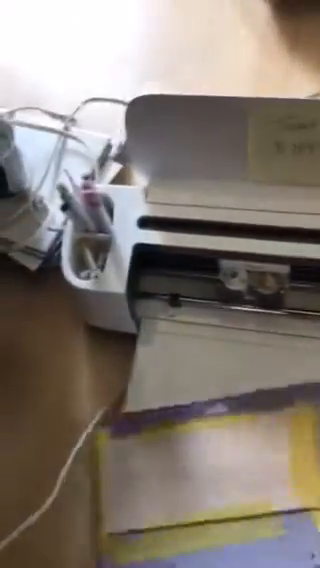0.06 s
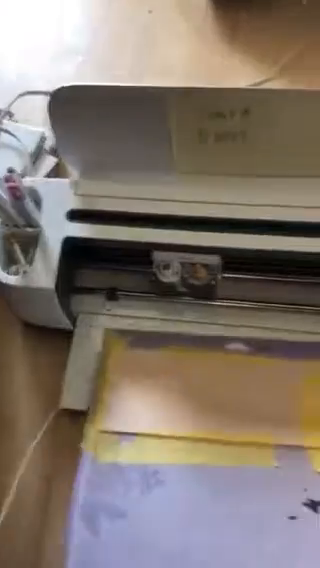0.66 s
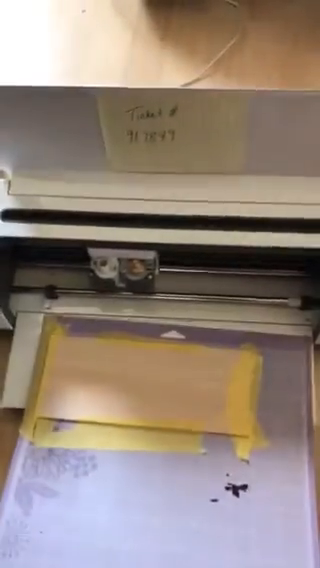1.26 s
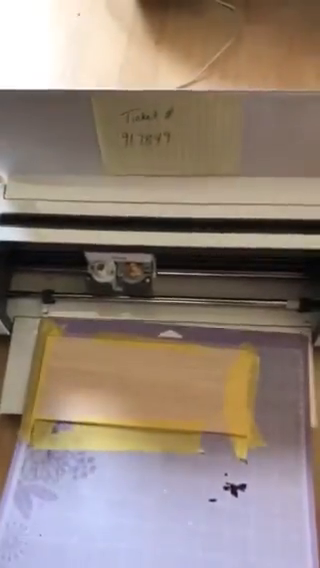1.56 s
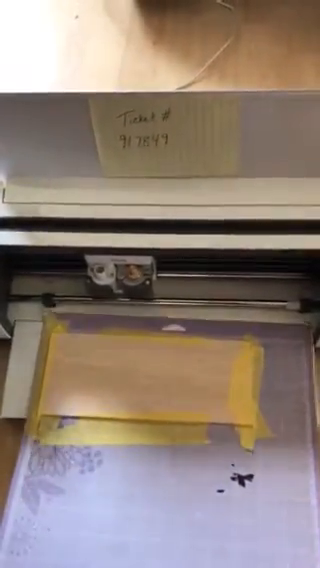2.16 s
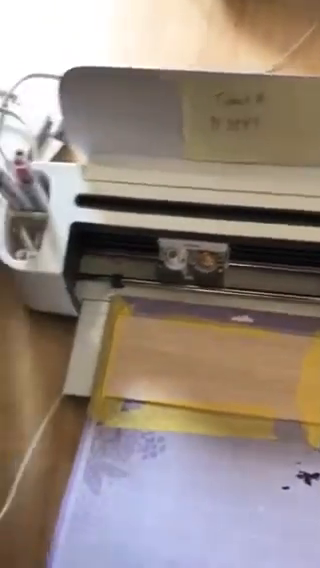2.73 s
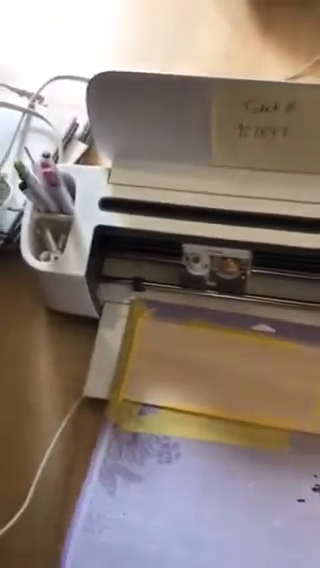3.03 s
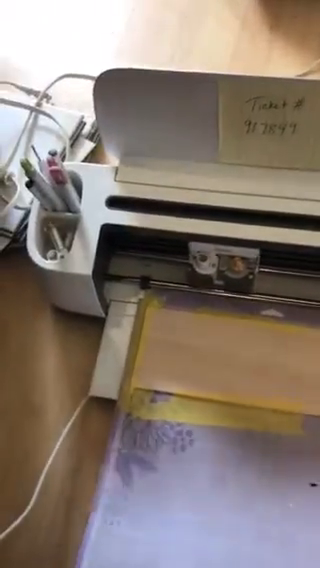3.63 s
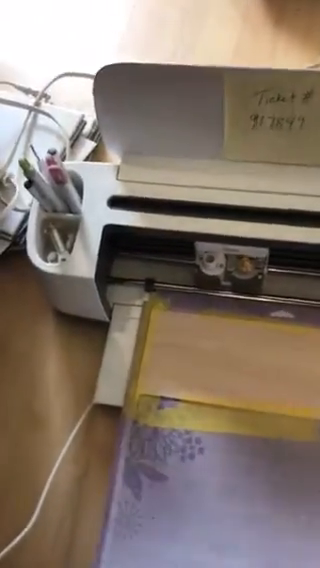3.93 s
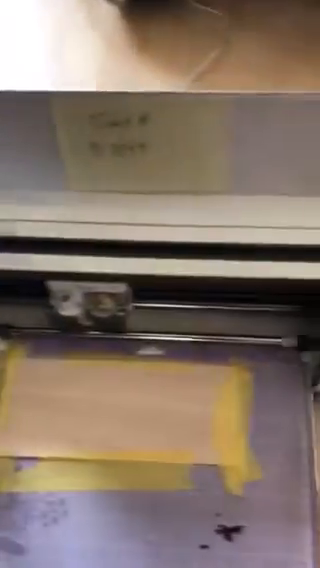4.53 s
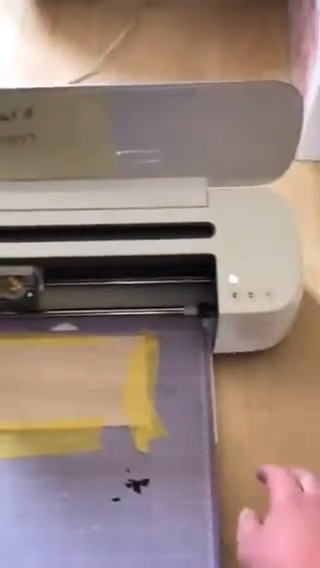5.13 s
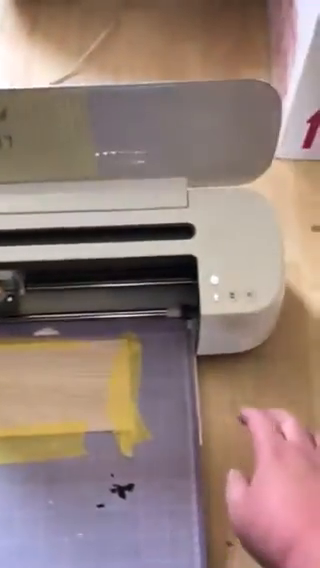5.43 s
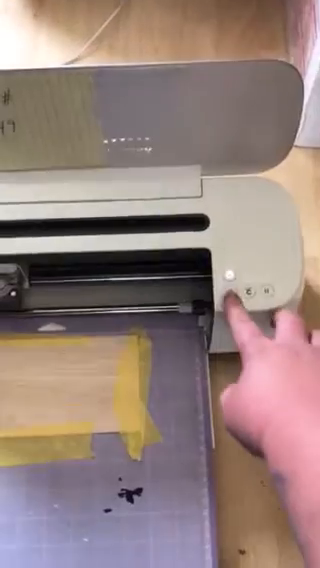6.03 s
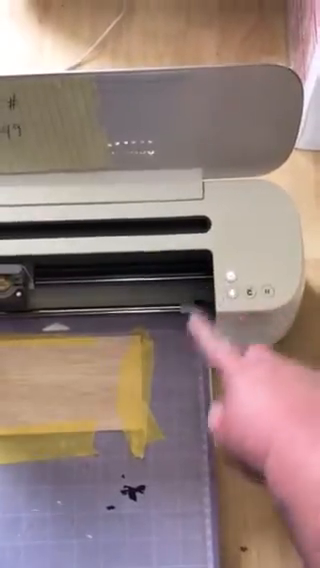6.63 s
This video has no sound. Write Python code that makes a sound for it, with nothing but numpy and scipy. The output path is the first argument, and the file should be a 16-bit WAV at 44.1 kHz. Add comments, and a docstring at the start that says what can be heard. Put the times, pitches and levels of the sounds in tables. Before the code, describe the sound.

Plastic mat swishing into a craft cutter, with light rubs and taps, followed by button clicks and a short motor whir.

```python
"""In a small, quiet room, a plastic mat is slid into a craft cutting machine on a desk.
Stick-slip friction makes the mat swish over the tray, and the sheet wobbles as it bends.
It knocks on the rollers, flicks over ridges and is nudged into line; each impact rings damped modes.
A finger clicks the load button and the feed motor whirs up, its gear teeth singing at multiples
of the shaft rate and rattling once a turn. A low rumble and hum lie underneath."""
import sys
import numpy as np
from scipy import signal
from scipy.fft import rfft, irfft
from scipy.io import wavfile
from scipy.ndimage import uniform_filter1d

SR = 44100
rng = np.random.default_rng(int(sys.argv[2]) if len(sys.argv) > 2 else 0)


def pcm_store(signal):
    """Save signal as 16-bit PCM."""
    levels = np.round(np.clip(np.atleast_2d(signal), -1, 1) * 32767)
    wavfile.write(sys.argv[1], SR, levels.astype(np.int16).T)


N = 303408
TIME = np.arange(N) / SR

# normal modes of mat and tray: frequency_hz, level_db, nominal_t60_s
MAT_AND_TRAY_MODES = [(199, -15.5, 0.24), (287.5, -7.5, 0.14), (336, -9.5, 0.12), (423, 1.5, 0.052),
                      (512.4, 0.5, 0.063), (560, -6.5, 0.079), (773, -1.5, 0.07), (887, 0, 0.057),
                      (1085, -17, 0.033), (1253, -5, 0.076), (1570, -17, 0.061), (1957, -7, 0.033),
                      (2466, -3.5, 0.053), (3330, 2.5, 0.02)]


def amp(db):
    """Amplitude ratio of a level in decibels."""
    return 10 ** (np.asarray(db) / 20)


def unit(x):
    """Normalisation to rms 1."""
    return x / np.sqrt(np.mean(x ** 2) + 1e-20)


def read(points, hz):
    """Interpolation of a table on a log-frequency axis."""
    f, value = np.transpose(points)
    return np.interp(np.log(hz + 1), np.log(f + 1), value)


def colour(x, spectrum):
    """Spectral shaping: x is weighted by a curve in dB, then set to rms 1."""
    return unit(irfft(rfft(x) * amp(read(spectrum, np.fft.rfftfreq(len(x), 1 / SR))), len(x)))


def drift(hz):
    """Random modulation: noise low-passed near hz, at rms 1."""
    lowpass = np.exp(-(np.fft.rfftfreq(N, 1 / SR) / hz) ** 2)
    return unit(irfft(rfft(rng.standard_normal(N)) * lowpass, N))


def band(x, edge_hz, kind):
    """Causal low-, high- or band-pass filtering."""
    return signal.sosfilt(signal.butter(3, edge_hz, kind, fs=SR, output="sos"), x)


def resonate(x, hz, width_hz):
    """Resonance: two unity-gain resonators in cascade, each width_hz wide."""
    b, a = signal.iirpeak(min(hz, SR / 3), hz / width_hz, fs=SR)
    return signal.lfilter(b, a, signal.lfilter(b, a, x))


def add(mix, start_s, sound):
    """Superposition of a sound on the mix."""
    part = mix[max(round(start_s * SR), 0):][:len(sound)]
    part += sound[:len(part)]


def air(noise_db=-54):
    """Ambient noise: broadband rumble and hiss, with a hum modulated in amplitude and phase."""
    # spectrum of the room's air: frequency_hz, density_db
    spectrum = [(20, -46), (42, -8.5), (58, -1.5), (95, -3), (130, -5.5), (180, -13.5), (340, -15.5),
                (450, -24.5), (700, -25), (1250, -27.5), (2000, -31), (4500, -37.5), (10300, -51.5),
                (12500, -45.5), (16000, -50)]
    # partials of the hum: frequency_hz, waver_hz, level_db
    partials = [(102.6, 8.8, -63.5), (290, 18.4, -71)]
    hum = 0
    for hz, waver_hz, db in partials:
        swell = 1 + .5 * drift(waver_hz)
        hum += amp(db) * unit(swell * np.cos(2 * np.pi * hz * TIME + 0.82 * drift(waver_hz)))
    return amp(noise_db) * colour(rng.standard_normal(N), spectrum) + hum


def room(x, wet_db):
    """Reverberation: dense reflections follow the direct sound and decay fastest in the treble."""
    # reverberation time: frequency_hz, t60_s
    decay = [(200, 0.19), (1000, 0.25), (4000, 0.22), (14000, 0.13)]
    hz, t, noise = signal.stft(rng.standard_normal(SR // 2), SR, nperseg=256)
    tail = signal.istft(noise * amp(-60 * t / read(decay, hz)[:, None]), SR, nperseg=256)[1]
    tail *= np.clip(np.arange(len(tail)) / SR / 0.0042 - .5, 0, 1)  # reflections arrive from 2 ms on
    return x + amp(wet_db) * signal.fftconvolve(x, tail / np.linalg.norm(tail))[:N]


def strokes(rows, rise_s, fall_s):
    """Incoherent summation: hand movements rise, hold and die away, and their powers add."""
    power = np.zeros(N)
    for start_s, length_s, db in rows:
        t = np.arange(0, length_s + 10 * fall_s, 1 / SR)
        gain = amp(db) * np.minimum(t / rise_s, 1) * np.exp(-np.maximum(t - length_s, 0) / fall_s)
        add(power, start_s, gain ** 2)
    return np.sqrt(power)


def friction(slips_per_s, spread_db, hiss, judder_db):
    """Stick-slip friction: tiny uneven slips over a smooth hiss, bunched by the judder of the hand."""
    slips = rng.standard_normal(N) * (rng.random(N) < slips_per_s / SR)
    slips *= amp(spread_db * np.minimum(rng.exponential(1, N), 4))
    return (unit(slips) + hiss * rng.standard_normal(N)) * amp(judder_db * drift(41))


def shimmer(x, depth_db):
    """Spectral modulation: narrow bands swell and fade as the contact moves over the sheet."""
    spectra = signal.stft(x, SR, nperseg=512, noverlap=384)[2]
    patches = uniform_filter1d(rng.standard_normal(spectra.shape), size=3, axis=0)
    patches = unit(uniform_filter1d(patches, size=12, axis=1))
    return unit(signal.istft(spectra * amp(depth_db * patches), SR, nperseg=512, noverlap=384)[1][:N])


def mat_slide(body_db=-4.0, hiss_reference_db=-41.5, hiss_growth=0.47):
    """Sliding friction: the harder the mat is shoved over the tray, the greater the share of hiss."""
    # spectrum of the scrape: frequency_hz, density_db
    spectrum = [(350, -10), (600, 0), (834, -7.5), (881, -0.5), (1530, -3.5), (1880, 0), (2720, -3),
                (4220, -3.5), (8620, -14), (9620, -11), (10300, -14.5), (14500, -14.5), (16000, -24)]
    # shoves of the hand: start_s, length_s, level_db
    shoves = [(0.012, .12, -55.5), (.139, .115, -45), (.316, 0.045, -38.5), (.37, .025, -44.5),
              (.415, 0.028, -47), (.55, 0.073, -51.5), (.632, 0.12, -50.5), (3.378, 0.034, -60),
              (4.005, 0.029, -57)]
    push = strokes(shoves, rise_s=0.019, fall_s=0.025)
    slips = friction(slips_per_s=2700, spread_db=2.3, hiss=2.2, judder_db=0.63)
    scrape = shimmer(colour(slips, spectrum), depth_db=3)
    body = amp(body_db) * unit(band(scrape, 3500, "low"))
    hiss = unit(band(scrape, 3630, "high")) * (push / amp(hiss_reference_db)) ** hiss_growth
    return (body + hiss) * push


def mat_catch():
    """Forced resonance: slips drive the sheet into a rasp as the slowing mat catches on the tray."""
    # resonances of the sheet: frequency_hz, half_width_hz, gain_db
    resonances = [(980, 130, -1), (1166, 140, 4.5), (2090, 72, 2), (2380, 210, 1)]
    # catches on the tray: start_s, length_s, level_db
    catches = [(.376, 0.029, -43), (.418, 0.017, -36)]
    slips = friction(slips_per_s=740, spread_db=2.4, hiss=0.8, judder_db=0.78)
    rasp = unit(sum(amp(db) * resonate(slips, hz, 2 * half_hz) for hz, half_hz, db in resonances))
    return rasp * strokes(catches, rise_s=0.013, fall_s=0.0098)


def mat_rub(gain_db=-1.5):
    """Light friction: uneven slips make a dull rubbing as the mat is nudged into line."""
    # spectrum of the rubbing: frequency_hz, density_db
    spectrum = [(180, -4), (330, 3.5), (500, -1.5), (640, -8.5), (1030, -3.5), (1320, -2.5), (1950, -16.5),
                (2480, -8.5), (3130, -16), (5200, -21), (7500, -29), (10300, -31.5), (12500, -29.5),
                (16000, -33)]
    # nudges of the hand: start_s, length_s, relative_level_db
    nudges = [(.77, 0.059, -54.5), (.895, 0.14, -55), (1.04, 0.16, -61.5), (1.255, 0.03, -54),
              (1.57, 0.47, -60), (1.69, 0.034, -59), (2.14, 0.16, -52.5), (2.49, 0.041, -55),
              (2.755, 0.057, -54.5), (3.07, 0.12, -60.5), (3.25, 0.076, -55.5), (3.375, 0.18, -54),
              (3.57, 0.36, -64.5), (4.085, 0.08, -56.5), (4.195, 0.11, -58)]
    slips = friction(slips_per_s=900, spread_db=5.3, hiss=2.16, judder_db=2.6)
    rub = amp(gain_db) * shimmer(colour(slips, spectrum), depth_db=4)
    return rub * strokes(nudges, rise_s=0.011, fall_s=0.038)


def mat_flex():
    """Flexural vibration: the bending sheet radiates a low band of noise."""
    # spectrum of the wobble: frequency_hz, density_db
    spectrum = [(120, -29), (230, 2), (330, 6), (520, -4), (700, -16), (1200, -23), (3000, -50)]
    # bends as the mat is carried and pushed home: start_s, length_s, level_db
    bends = [(0, 0.44, -52.5), (.483, 0.1, -48), (.514, 0.028, -37.5), (.66, 0.083, -47.5)]
    return colour(rng.standard_normal(N), spectrum) * strokes(bends, rise_s=0.0084, fall_s=0.02)


def impacts(rows, modes, crack_spectrum, contact_s, mode_t60_scale, crack_db, crack_t60_s,
            spot_t60_s, spot_q):
    """Impact excitation: damped modes, a crack and the struck spot swell over the contact time."""
    out, t = np.zeros(N), np.arange(SR // 4) / SR
    swell = 1 - np.exp(-(t / contact_s) ** 2)
    for start_s, db, thud_db, snap_db, spot_hz, spot_db in rows:
        tones = sum(amp(mode_db - 60 * t / (t60 * mode_t60_scale))
                    * np.sin(2 * np.pi * (hz * t + rng.random())) for hz, mode_db, t60 in modes)
        grit = rng.standard_normal(len(t))
        crack = colour(grit, crack_spectrum) * amp(-60 * t / crack_t60_s)
        hit = (unit(tones) + amp(crack_db) * unit(crack)) * swell
        spot = resonate(grit * amp(-60 * t / spot_t60_s) * swell, spot_hz, spot_hz / spot_q)
        parts = band(hit, [215, 620], "band"), band(hit, [600, 2500], "band"), band(hit, 2500, "high")
        thud, middle, snap, spot = (p / np.std(p[:SR // 100]) for p in (*parts, spot))
        # relative to the middle band, a firm blow gives more thud and a hard one more snap
        blow = amp(thud_db) * thud - middle + amp(snap_db) * snap + amp(spot_db) * spot
        add(out, start_s, amp(db) * blow)
    return out


def mat_knocks():
    """Damped modal ringing: the mat, held by the hand, knocks on rollers and guides."""
    # knocks: start_s, level_db, thud_db, snap_db, spot_hz, spot_db
    knocks = [(.601,-30.5,8,1,753,6.5), (.755,-55,4,-18,508,10), (.937,-57.5,10.5,7.5,400,-6),
              (1.006,-62,-7,2.5,2120,7.5), (2.288,-43,3.5,-16,454,-4.5), (2.642,-56.5,-7,-14,2490,0.5),
              (2.786,-38.5,-2,-17,980,-2), (2.794,-50,-11,-20,316,4), (3.285,-52,-14,-11.5,1590,5),
              (3.751,-65,-2,-5,483,-7), (3.941,-61,6,-5.5,1150,8), (4.085,-40.5,-13,-13,915,-3),
              (4.113,-51,-3,-6.5,693,8), (4.21,-61,-8,-19,905,5.5), (4.3,-55,-13,-17,1670,0),
              (4.561,-59,-6,-3,830,1)]
    # dense high modes of the tray: frequency_hz, density_db
    crack = [(150, -9), (400, -7), (1200, -6), (2000, -12.5), (3600, -7.5), (6000, -15), (10000, -20),
             (13000, -21), (16000, -28)]
    return impacts(knocks, MAT_AND_TRAY_MODES, crack, contact_s=0.0032, mode_t60_scale=0.61,
                   crack_db=0, crack_t60_s=0.047, spot_t60_s=0.02135, spot_q=4.7)


def edge_flicks():
    """Brief contact gives a sharp attack: the mat's edge flicks over ridges."""
    # flicks: start_s, level_db, thud_db, snap_db, spot_hz, spot_db
    flicks = [(.022,-57.5,3,-9,7040,-2), (.088,-49,-4,-5.5,4030,-14), (.3033,-50,-20,10,3800,8),
              (.5425,-45,4,2.5,3600,-9), (.641,-43.5,0,-4,4460,-13), (.65,-54,-4,4,2200,-3),
              (.672,-42.5,-8,6.5,3620,-4), (2.779,-51,4,1,6320,-11), (4.6295,-73,-8,13,5300,17)]
    # dense high modes of the edge: frequency_hz, density_db
    crack = [(200, -22), (800, -1), (2000, -9), (3800, 1), (7000, -1.5), (10000, -5.5), (13000, -5),
             (16000, -9)]
    return impacts(flicks, MAT_AND_TRAY_MODES, crack, contact_s=0.0006, mode_t60_scale=0.65,
                   crack_db=3.5, crack_t60_s=0.0475, spot_t60_s=0.011, spot_q=1.5)


def load_button():
    """Impulse response of a panel: it clicks as the button is touched, pressed and let go."""
    # clicks: start_s, level_db, thud_db, snap_db, spot_hz, spot_db
    clicks = [(6.091,-67,-16,-10,600,6), (6.112,-51.5,-20,-4.5,3300,-15), (6.4085,-46.5,-4,-2.5,830,-5),
              (6.545,-44,0,-1,2850,-12)]
    # normal modes of button and panel: frequency_hz, level_db, nominal_t60_s
    modes = [(567, -2.5, 0.054), (628, -4, 0.089), (753, -5, 0.083), (851, 8, 0.029), (990, 2, 0.053),
             (1330, -6, 0.079), (1650, -1, 0.055), (2900, -15, .02)]
    # dense high modes of the panel: frequency_hz, density_db
    crack = [(300, -19), (800, -2.5), (2200, -6), (2900, 5), (4600, 1.5), (7000, -5.5), (8800, -12.5),
             (11000, -4), (13500, -3), (16000, -5)]
    return impacts(clicks, modes, crack, contact_s=0.0004, mode_t60_scale=1.27,
                   crack_db=9.5, crack_t60_s=0.03175, spot_t60_s=0.06, spot_q=2.1)


def driver_whine(switch_on_s=6.645, pitch_hz=14998, level_db=-66):
    """Electrical excitation: the motor's driver gives a thin tone while current flows."""
    tone = unit(np.sin(2 * np.pi * pitch_hz * TIME)) * (1 + .2 * drift(50))
    return amp(level_db) * tone * np.clip((TIME - switch_on_s) / .01, 0, 1)


def feed_motor(throb=0.29, waver=0.0023, frame_hz=330, tight_spot_s=6.797, looseness=0.65,
               flutter_db=1.5, scatter_turns=0.7):
    """Gear meshing: teeth sing at shaft harmonics and rattle once a turn; the loaded frame groans."""
    # the run-up: time_s, shaft_hz, teeth_db, rattle_db, groan_db
    run_up = [(6.635, 23, -99, -74, -90), (6.655, 26, -46, -49, -61), (6.672, 28, -57.5, -54.5, -49),
              (6.695, 36, -49.5, -49.5, -53), (6.712, 38.3, -41, -46.5, -50), (6.74, 39.1, -43, -45.5, -62),
              (6.791, 39, -42, -47, -69), (6.88, 39.5, -40.5, -46, -71)]
    # mesh harmonics and sidebands of an eleven-tooth pinion: shaft_multiple, level_db
    harmonics = [(11, -15.5), (15, -15), (21, -9.5), (22, 0), (25, -12.5), (27, -17), (30, -28), (31, -2),
                 (32, -5), (33, -2.5), (34, -0.5), (35, -10), (36, -16), (37, -2), (38, -12), (45, -15),
                 (55, -11.5), (59, -31), (77, -35), (85, -25), (87, -18), (89, -32), (133, -25)]
    # frequency response of the housing: frequency_hz, gain_db
    housing = [(150, -19), (330, 2), (650, -7), (1000, 8), (1350, 1.5), (1800, -9.5), (2300, 0), (2900, -7),
               (3420, -0.5), (3900, -11), (4600, -15), (5250, -11), (6600, -20), (9500, -18), (10400, -25),
               (13300, -15), (16000, -28)]
    time_s, shaft_hz, *levels_db = np.transpose(run_up)
    teeth_gain, rattle_gain, groan_gain = (
        amp(np.interp(TIME, time_s, db, left=-120, right=-120)) for db in levels_db)
    turns = np.cumsum(np.interp(TIME, time_s, shaft_hz) * (1 + waver * drift(43))) / SR
    turns -= np.interp(tight_spot_s, TIME, turns)  # the harmonics roughly line up at the tight spot
    teeth = unit(sum(amp(db) * np.cos(2 * np.pi * (multiple * turns + scatter_turns * rng.random()))
                     for multiple, db in harmonics))
    # the same rough spots come round on every turn, hardest where the gears run tight
    wear = rng.standard_normal(1024)
    roughness = unit(np.interp(turns % 1, np.linspace(0, 1, len(wear)), wear))
    roughness += looseness * rng.standard_normal(N)
    pressure = np.exp(throb * np.cos(2 * np.pi * turns))
    teeth = unit(teeth * pressure ** 0.37 * amp(flutter_db * drift(160)))
    rattle = colour(roughness * pressure, housing)
    groan = unit(np.sin(2 * np.pi * frame_hz * TIME + drift(69)) * (1 + .3 * drift(84)))
    return teeth * teeth_gain + rattle * rattle_gain + groan * groan_gain


def scene():
    """Superposition: reverberant mat and button, direct motor sound and ambient noise, in mono."""
    blows = room(mat_knocks() + edge_flicks() + load_button(), wet_db=-12.5)
    sliding = room(mat_slide() + mat_catch() + mat_rub() + mat_flex(), wet_db=-10.5)
    return (blows + sliding + feed_motor() + driver_whine() + air())[None]


def record(dry):
    """Band limiting: a linear-phase low-pass removes the highest treble."""
    cutoff_hz = 15900
    lowpass = signal.firwin(511, cutoff_hz, window=("kaiser", 9), fs=SR)
    return signal.oaconvolve(dry, lowpass[None], "same")


dry = scene()
out = record(dry)
pcm_store(out)
```